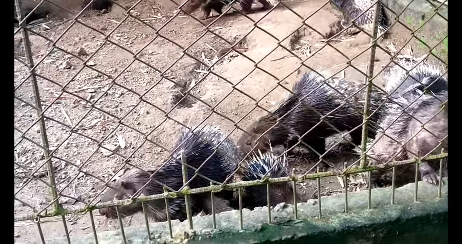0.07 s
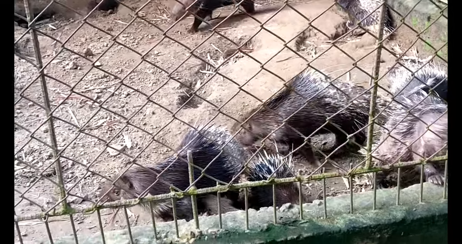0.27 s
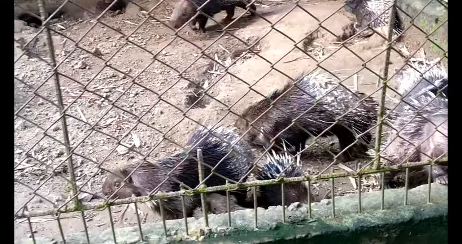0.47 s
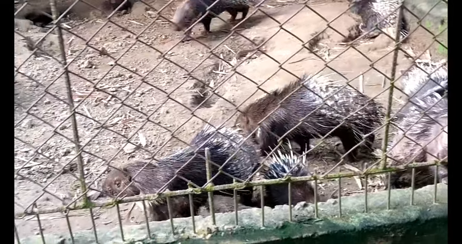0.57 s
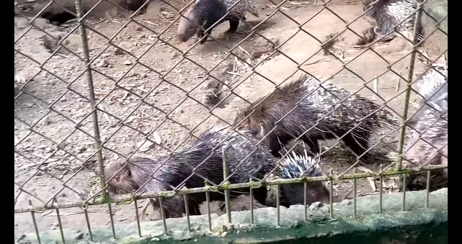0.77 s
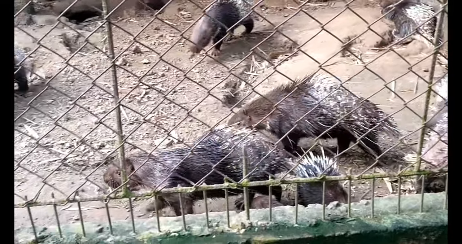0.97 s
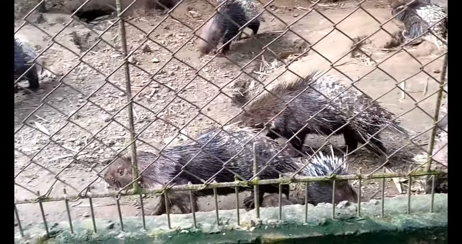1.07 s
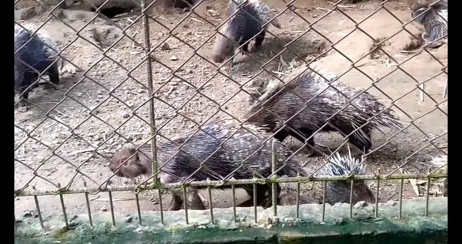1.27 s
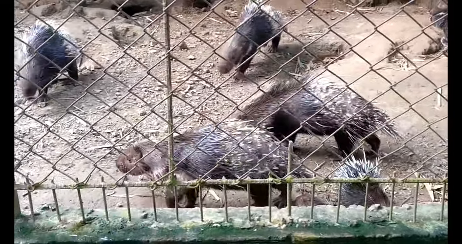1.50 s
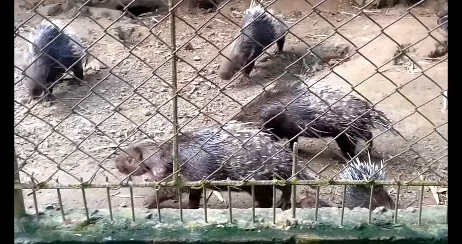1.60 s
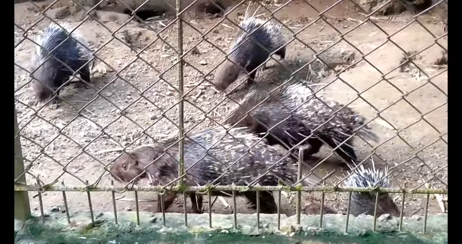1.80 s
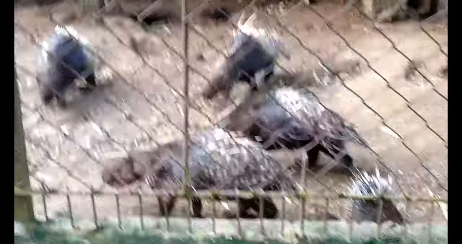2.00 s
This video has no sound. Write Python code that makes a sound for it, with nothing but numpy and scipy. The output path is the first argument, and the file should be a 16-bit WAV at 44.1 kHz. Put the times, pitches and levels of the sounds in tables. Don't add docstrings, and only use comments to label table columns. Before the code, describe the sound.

After a brief light rustle, a nasal, wavering animal cry rises and falls for over a second, over bright quill rattles and soft steps, then fades to faint ticks; outdoor pen, close stereo phone pickup.

```python
import sys
import numpy as np
from scipy import signal
from scipy.fft import rfft, irfft
from scipy.io import wavfile
from scipy.ndimage import uniform_filter1d

SR = 44100
rng = np.random.default_rng(int(sys.argv[2]) if len(sys.argv) > 2 else 0)


def output_pcm(signal):
    pcm = np.clip(np.atleast_2d(signal).T, -1, 1) * 32767
    wavfile.write(sys.argv[1], SR, np.round(pcm).astype(np.int16))


def volts_from_db(level):
    exponent = np.asarray(level, float) / 20
    return 10 ** exponent


N = 90404


def on_log(table, hz):
    table = np.array(table)
    return np.interp(np.log(np.maximum(hz, 1)), np.log(table[:, 0]), table[:, 1])


def colour(x, table):
    log_gain = on_log(table, np.arange(1025) * SR / 2048) * np.log(10) / 20
    cepstrum = irfft(log_gain)
    cepstrum[1:1024] *= 2
    cepstrum[1025:] = 0
    impulse = irfft(np.exp(rfft(cepstrum)))
    return signal.fftconvolve(x, impulse[None], axes=1)[:, :N]


def band(x, lo_hz, hi_hz):
    return signal.sosfilt(signal.butter(2, [lo_hz, hi_hz], "bandpass", fs=SR, output="sos"), x)


def unit(x):
    return x / np.sqrt(np.mean(x ** 2))


def steep(x, lo_hz, hi_hz):
    return unit(band(band(x, lo_hz, hi_hz), lo_hz, hi_hz))


def walk(rate_hz):
    length = int(SR / rate_hz)
    return unit(uniform_filter1d(uniform_filter1d(rng.standard_normal(N), length), length))


# f/Hz, share common to both [0-1]
LIKENESS = [(30, .4), (100, 0.9), (1000, 0.72), (3000, 0.7), (5000, 0.58), (7000, 0.8), (14000, 0.28)]


def pair(common, left, right):
    share = np.clip(on_log(LIKENESS, np.arange(N // 2 + 1) * SR / N), 0, 1)
    own = rfft(np.array([left, right]))
    return irfft(np.sqrt(share) * rfft(common) + np.sqrt(1 - share) * own, N)


# f/Hz, level/dB per Hz
AIR = [(25, -12.5), (100, -7), (200, -5.5), (330, -26), (700, -14.5), (2000, -29), (3500, -32.5),
       (8000, -20)]
AIR_DB = -76


def air():
    hum = colour(pair(*rng.standard_normal((3, N))), AIR)
    hum = hum / np.std(band(hum, 25, 1000))
    flutter_db = -1.5 + 1.7 * np.clip(walk(39.8), -2, 1.5)
    return volts_from_db(AIR_DB) * (hum + volts_from_db(flutter_db) * steep(rng.standard_normal(N), 175, 300))


TICK_SPREAD_DB = 3


def ticks(per_s):
    strikes = rng.random(N) < per_s / SR
    size = volts_from_db(TICK_SPREAD_DB * rng.exponential(size=N))
    return unit(strikes * rng.standard_normal(N) * size)


GRAIN_LO_HZ, GRAIN_HI_HZ, GRAIN_OCTAVES = 2680, 12000, 0.36


def scatter(x, spread_s, count=14):
    group = np.repeat(rng.integers(0, count, N // 24 + 1), 24)[:N]
    paths = rng.standard_normal((count, 3, 400)) * np.exp(-np.arange(400) / SR / spread_s)
    paths /= np.sqrt((paths ** 2).sum(2, keepdims=True))
    spread = 2 ** GRAIN_OCTAVES
    heard = np.zeros((3, N))
    for g, hz in enumerate(np.geomspace(GRAIN_LO_HZ, GRAIN_HI_HZ, count)):
        clicks = band(x * (group == g), hz / spread, min(hz * spread, .45 * SR))
        heard += signal.fftconvolve(clicks[None], paths[g], axes=1)[:, :N] * np.sqrt(GRAIN_HI_HZ / hz)
    return pair(*heard)


def echoes(x, spread_s):
    paths = rng.standard_normal((3, 300)) * np.exp(-np.arange(300) / SR / spread_s)
    paths /= np.sqrt((paths ** 2).sum(1, keepdims=True))
    return pair(*signal.fftconvolve(x[None], paths, axes=1)[:, :N])


def loudness_scale(table):
    noise = colour(colour(rng.standard_normal((1, N)), table), RING)
    return np.std(band(noise, 5000, 10000))


# t/s, level/dB
SHUFFLE = [(0, -62.5), (0.049, -72.5), (0.108, -54), (.18, -60.5), (.215, -55.5), (0.298, -54.5),
           (0.398, -48), (.54, -55), (0.601, -54.5), (.68, -60.5), (0.798, -56), (.85, -41), (.92, -48),
           (1.0, -49), (1.07, -51), (1.15, -42.5), (1.22, -39), (1.34, -43), (1.39, -49), (1.47, -47.5),
           (1.53, -55), (1.65, -47.5), (1.72, -51), (1.8, -56), (1.87, -58.5), (1.93, -84.5), (1.99, -71),
           (2.05, -74)]
# t/s, peak level/dB, length/s, low body level/dB, top level/dB
SHAKES = [(0.0207, -30, 0.0063, -28, -12), (0.102, -39, 0.0023, -13, -8), (0.117, -34, 0.0017, -15, -6),
          (0.1218, -27.5, 0.0017, -15, -5), (0.214, -36, 0.0045, -12, -6), (.381, -20, 0.0041, -14.5, -7.5),
          (0.401, -30, .004, -10, -10), (0.4377, -29.5, 0.0053, -2, -5), (0.497, -29.5, 0.0045, -8, -8),
          (.5172, -31, 0.0014, -28, -15), (0.5364, -24.5, 0.0065, -10, -2), (0.57, -38.5, 0.0018, -13, -19),
          (.8215, -31, .002, -18, -8), (0.831, -18.5, .012, -7, -8.5), (0.844, -20, .004, -6, -9),
          (0.852, -25, .008, -13, 0), (0.875, -33, .004, -15, -18), (0.904, -26, 0.0039, -25, -6),
          (0.9297, -27.5, .004, -14, -7), (0.9482, -24, 0.0016, -17, -1), (0.9557, -25, 0.0067, -5, -9),
          (0.979, -27.5, .003, -11, -3), (0.9887, -24, 0.005, -12, -16), (1.014, -36, 0.0024, -18, -1),
          (1.157, -31, 0.0047, -25, -6), (1.1902, -23, 0.0045, -9, 4), (1.2511, -18.5, 0.0054, -15.5, -5),
          (1.259, -24, 0.0028, -11, -4), (1.288, -27, .004, -24, -6), (1.3145, -23, 0.0036, -17.5, -6),
          (1.325, -22.5, 0.014, -24, 0), (1.4184, -31.5, .012, -20, 2), (1.499, -26, .012, -7, -13.5),
          (1.5379, -35.5, 0.0046, -10, -3), (1.5599, -32.5, .004, -4, 0),
          (1.5893, -25.5, 0.0065, -10, -0.5), (1.6365, -20.5, 0.0048, -13.5, -3.5),
          (1.6883, -24, 0.0066, -22, -5), (1.761, -32.5, 0.016, -20, 2), (1.7972, -24, .002, -8, 2),
          (1.575, -29, .004, -17, -4),
    (1.649, -34.5, .01, -9, -4),
    (1.712, -31, 0.0027, -22, 5),
    (1.831, -36, 0.0037, -18, -6),
    (1.8432, -36, 0.0016, -7, 4),
    (1.942, -39, 0.0028, -29, -5),
    (2.0126, -39, 0.0041, -24, 1),
    (2.032, -42.5, 0.0044, -10, -1),
]
# f/Hz, level/dB per Hz
QUILL = [(300, -46), (1200, -5), (2200, -20), (3300, -7), (5500, -4.5), (8500, -5.5), (10500, -8),
         (14000, -10.5)]
# f/Hz, level/dB per Hz
HISS = [(1000, -42), (3000, -15.5), (5500, -10), (7200, -11), (8600, -25.5), (10000, -14.5), (14000, -35)]
TICKS_PER_S, SHAKE_TICKS_PER_S = 7000, 9000
RUSTLE_DB, SHAKE_DB, HISS_DB, PATCHY_DB = 7, -9.5, 1, 1.5
HISS_FOLLOWS = .6
RISE_S, LEAD_DB = .0005, -2
BODY_HZ, CORE_HZ, EDGE_HZ = (1950, 5340), (5330, 9100), (9400, 21300)


def quills(t):
    s, db = np.array(SHUFFLE).T
    effort_db = np.interp(t, s, db)
    core, body, edge = np.zeros((3, N))
    dense = np.clip(ticks(SHAKE_TICKS_PER_S), -3, 3)
    for s0, peak_db, length_s, low_db, top_db in SHAKES:
        age = t - s0
        tick = np.exp(-np.abs(age) / .0006)
        tail = np.exp(-(age / np.where(age > 0, max(length_s, .001), RISE_S)) ** 4)
        burst = volts_from_db(peak_db + SHAKE_DB) * (volts_from_db(LEAD_DB) * tick + tail) * dense
        core += burst
        body += volts_from_db(low_db + 17) * burst
        edge += volts_from_db(top_db) * burst

    patchy = volts_from_db(effort_db + RUSTLE_DB + PATCHY_DB * walk(67))
    unused = None
    parts = ((core, CORE_HZ), (body, BODY_HZ), (edge, EDGE_HZ))
    shaken = sum(band(echoes(x, 0.00072), *hz) for x, hz in parts)
    rustle = scatter(patchy * np.clip(ticks(TICKS_PER_S), -6, 6), 0.003)
    bright = colour(rustle + shaken, QUILL) / loudness_scale(QUILL)

    hiss = colour(pair(*rng.standard_normal((3, N))), HISS) / loudness_scale(HISS)
    return bright + hiss * volts_from_db(HISS_DB + HISS_FOLLOWS * (effort_db + 56.0) - 55.0)


# t/s, level/dB, f/Hz
KNOCKS = [
    (.075, -68, 230),
    (.145, -68, 300),
    (.381, -50, 900),
    (.441, -53, 800),
    (.958, -43, 450),
    (1.503, -46, 650),
    (1.56, -68, 350),
    (1.8, -66, 550),
    (.54, -52, 900),
    (.02, -68, 300),
]


def knocks(t):
    noise = rng.standard_normal(N)
    out = np.zeros(N)
    for s0, db, hz in KNOCKS:
        out += volts_from_db(db) * np.exp(-((t - s0) / 0.0057) ** 2) * steep(noise, hz / 1.83, hz * 1.67)
    return out


LIP_S, LIP_DB = .2148, -36.5


def lip_click(t):
    puff = (t > LIP_S) * np.exp(-np.abs(t - LIP_S) / 0.0011) * rng.standard_normal(N)
    return volts_from_db(LIP_DB) * 4 * band(band(puff, 760, 2100), 780, 3800)


def resonance(f, centre_hz, width_hz):
    return 1 / (1 + (2 * (f - centre_hz) / width_hz) ** 2)


# f/Hz, width/Hz, level/dB
THROAT = [(390, 202, -5), (875, 197, 4.5), (1125, 420, 0), (1637, 150, -5.5), (1906, 406, -3.5)]
# f/Hz, width/Hz, level/dB
UPPER = [
    (4500, 2600, -16),
]
NASAL_HZ, NASAL_WIDTH_HZ, ROOF_HZ = 2605, 860, 2830


def vocal_tract(f, nasal_db, opening):
    throat = sum(volts_from_db(db) * resonance(f, hz, width) for hz, width, db in THROAT)
    throat = throat / (1 + (f / ROOF_HZ) ** 20)
    nose = volts_from_db(nasal_db) * resonance(f, NASAL_HZ, NASAL_WIDTH_HZ) ** 2
    upper = sum(volts_from_db(db) * resonance(f, hz, width) for hz, width, db in UPPER)
    return throat + nose + opening * upper


# t/s, pitch f/Hz, level/dB, brightness/dB per octave, nasal ring level/dB
CRY = [
    [(.215, 847, -30, 2.5, -19), (.259, 772, -31, -3.5, -5.5), (.333, 566, -41.5, -1.5, -4),
     (.367, 616.4, -42.5, -5, -9), (.415, 498.3, -39.5, -5, 1), (.455, 485, -38, -8, -1),
     (.483, 347.4, -37, -7.5, 3.5), (.549, 458.4, -38, -11.5, 2), (.585, 390.5, -34.5, -3, -12)],
    [(.637, 488.5, -42, -11.5, -1), (.671, 497, -45, -6, -24), (.729, 601.5, -42, -1.5, -3),
     (.812, 664.3, -35, -3.5, 1.5), (.883, 601, -38, -5.5, 7), (.931, 647.4, -37, -9.5, 7),
     (.979, 528.7, -40.5, -7, 9), (1.005, 404, -33, -7.5, -24)],
]
# t/s, pitch f/Hz, level/dB, brightness/dB per octave, nasal ring level/dB
CRY_END = [
    [(1.039, 466, -39, -6, -23), (1.079, 542, -41, -2.5, -34), (1.105, 559.3, -41, -2.5, -33),
     (1.143, 532.4, -41.5, -5, -9), (1.181, 548.3, -40.5, -4.5, -8), (1.217, 532, -35, 0, 3.5),
     (1.281, 536, -34.5, 0, 0.5)],
    [(1.311, 477.2, -34.5, 0.5, -13), (1.359, 376, -35, -4, 8.5), (1.39, 365.6, -39, -2.5, 2),
     (1.445, 390, -36, -3.5, -5.5), (1.463, 384.7, -36, -3.5, -22), (1.477, 347.7, -37, -5.5, 1),
     (1.501, 262.1, -43.5, -14.5, 12), (1.515, 222, -49, -15, 10)],
]
WOBBLE, WOBBLE_HZ, SHIMMER_DB, SHIMMER_HZ = 0.00597, 40.4, 3, 27.8
ATTACK_S, RELEASE_S = 0.013, 0.0072
HIGH_NOTE_HZ, OPENS_DB_PER_OCT, BRIGHTEST_DB_PER_OCT = 660, 40, 2
BLUR_HZ, BLUR_FROM_HZ, BLUR = 260, 1700, .45
BREATH_BELOW_DB = -19


def cry(t):
    s, *controls = np.concatenate(CRY + CRY_END).T
    hz, db, slope, nasal_db = (uniform_filter1d(np.interp(t, s, c), 400) for c in controls)
    slope = uniform_filter1d(np.minimum(slope, BRIGHTEST_DB_PER_OCT), 1300)
    nasal_db = uniform_filter1d(nasal_db, 1300)
    opening = volts_from_db(OPENS_DB_PER_OCT * np.minimum(np.log2(hz / HIGH_NOTE_HZ), 0))
    f0 = hz * (1 + WOBBLE * walk(WOBBLE_HZ))
    phase = 2 * np.pi * np.cumsum(f0) / SR

    gains = []
    for k in range(1, 11):
        source = volts_from_db(slope * np.log2(k) + SHIMMER_DB * walk(SHIMMER_HZ))
        gains.append(source * vocal_tract(k * f0, nasal_db, opening))
    tone = np.zeros(N)
    for k, gain in enumerate(gains, 1):
        husky = 1 + BLUR * np.clip(k * f0 / BLUR_FROM_HZ - 1, 0, 1) * walk(BLUR_HZ)
        tone -= gain * husky * np.cos(k * phase - 0.277 * k ** 2)
    tone /= np.sqrt((np.array(gains) ** 2).sum(0) / 2)

    breath = (1 + np.cos(phase)) * steep(rng.standard_normal(N), 1000, 3120)
    rise = np.clip((t - s[0]) / ATTACK_S, 0, 1)
    fall = np.clip((s[-1] - t) / RELEASE_S, 0, 1)
    gate = np.sin(np.pi / 2 * rise * fall) ** 2
    return (tone + volts_from_db(BREATH_BELOW_DB) * breath) * gate * volts_from_db(db)


YARD_T60_S, YARD_DB = 0.25, -16.5


def yard(voice, t):
    tail = rng.standard_normal((2, 9000)) * volts_from_db(-60 * t[:9000] / YARD_T60_S)
    tail = tail / np.sqrt((tail ** 2).sum(1, keepdims=True)) * volts_from_db(YARD_DB)
    return signal.fftconvolve(voice[None], tail, axes=1)[:, :N]


def scene():
    t = np.arange(N) / SR
    voice = cry(t) + lip_click(t)
    return voice + yard(voice, t) + quills(t) + knocks(t) + air()


# f/Hz, left minus right level/dB
PORTS = [(400, -1), (1300, 0.2), (4400, 1), (6500, 0.5), (8000, 8.5), (11000, 11), (15000, 15.5)]
# f/Hz, level/dB
RING = [(4800, 0), (6000, 5), (7200, 18), (8300, 6.5), (9800, 1.5)]
TOP_HZ = 14120


def microphone_ports(dry):
    half = np.array(PORTS) * [1, .5]
    left = colour(dry[:1], half)
    right = colour(dry[1:], half * [1, -1])
    x = colour(np.concatenate([left, right]), RING)
    low_pass = signal.ellip(8, .3, 60, TOP_HZ, fs=SR, output="sos")
    return 0.0056 * x + signal.sosfilt(low_pass, x)


def band_limit(x):
    return signal.sosfilt(signal.butter(12, 15490, fs=SR, output="sos"), x)


def record(dry):
    mix = microphone_ports(dry)
    return band_limit(mix)


dry = scene()
out = record(dry)
output_pcm(out)
```